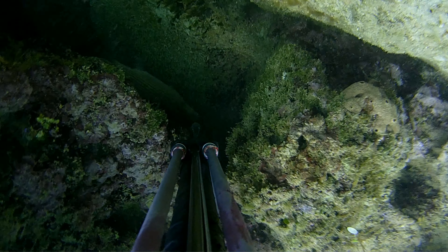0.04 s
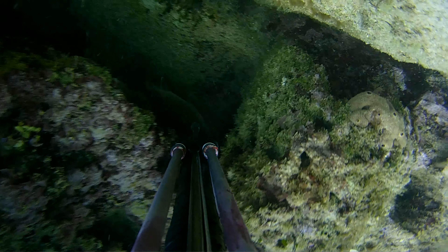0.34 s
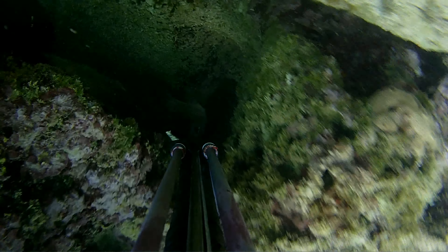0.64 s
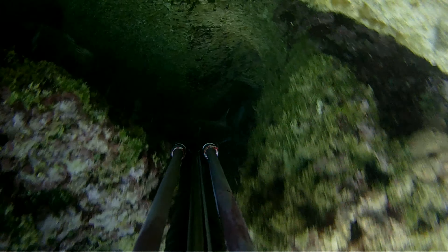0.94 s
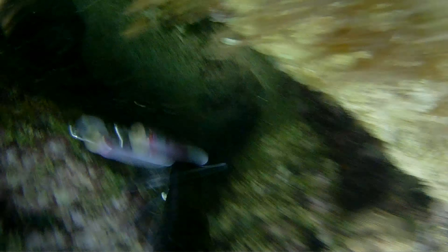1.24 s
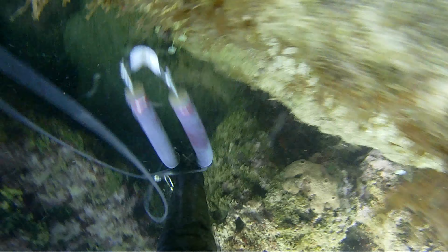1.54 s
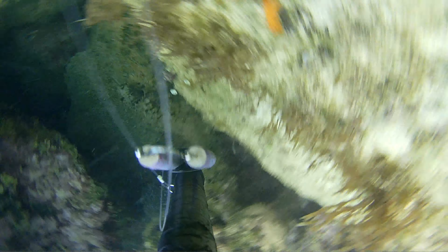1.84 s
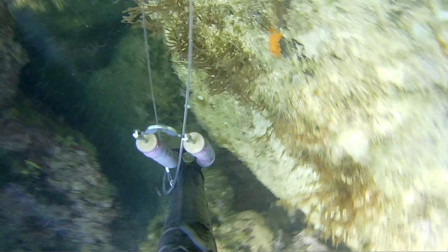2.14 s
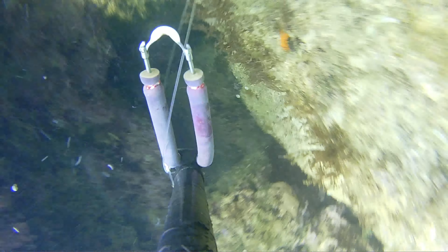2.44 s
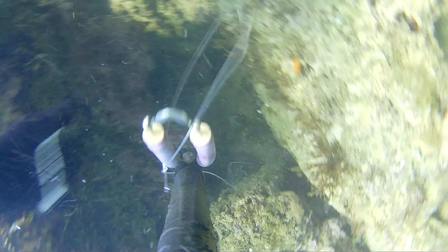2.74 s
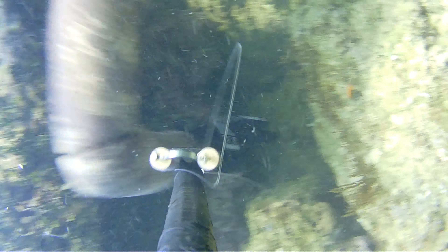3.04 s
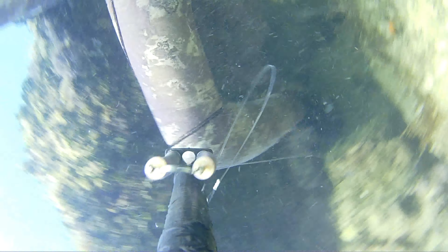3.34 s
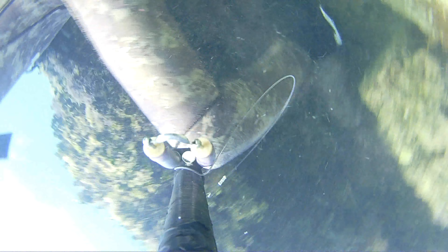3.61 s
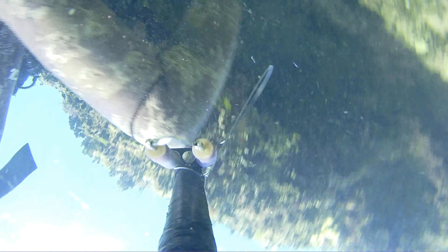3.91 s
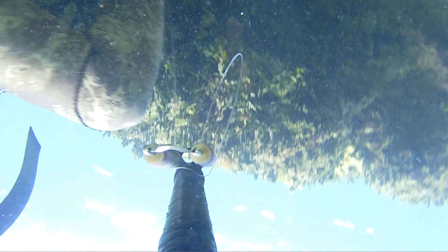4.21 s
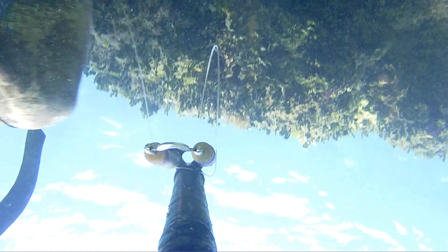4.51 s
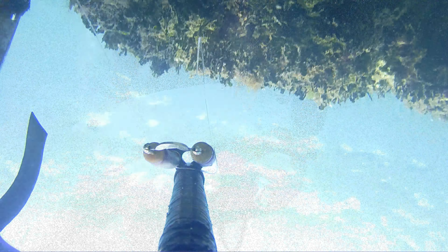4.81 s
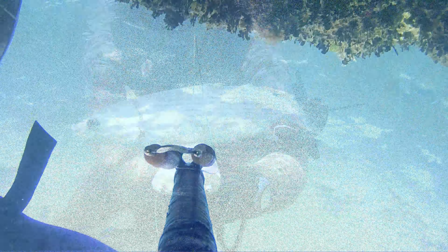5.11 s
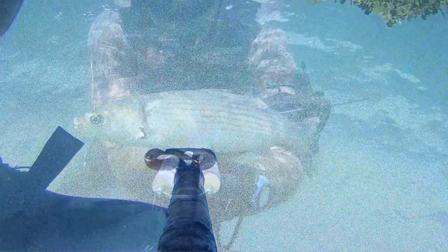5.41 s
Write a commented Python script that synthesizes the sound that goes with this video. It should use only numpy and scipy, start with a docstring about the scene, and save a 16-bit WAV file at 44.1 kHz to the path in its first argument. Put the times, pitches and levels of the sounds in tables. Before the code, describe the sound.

A speargun is heard very close under water, through a sealed housing mounted on it. Soft knocks and a low swirl of water lead to one loud, slightly distorted shot as the spear clatters down its rail. Line and rubber bands then rub along the barrel with tiny bubbles and short squeaks. Afterwards there is mostly a faint steady hiss and the scattered clicks of reef shrimp.

```python
"""A faint hiss and the crackle of reef shrimp, under water, from a camera in a sealed housing on a speargun.
Handling knocks ring the barrel right by the microphone, and water eddies round the housing at each jolt.
The gun fires: the spear chatters down its rail and overloads the input. The line whips out, the slack
bands wobble, rub and squeak, small bubbles gurgle, and the shrimp snap on between a few last knocks."""
import sys
import numpy as np
from scipy import signal
from scipy.fft import rfft, irfft
from scipy.io import wavfile
from scipy.ndimage import uniform_filter1d

SR = 44100
rng = np.random.default_rng(int(sys.argv[2]) if len(sys.argv) > 2 else 0)


def generate_wav(signal):
    """Clip the signal to [-1, 1] and save it as 16-bit WAV at the path in sys.argv[1]."""
    frames = np.transpose(np.atleast_2d(signal))
    scaled = np.clip(frames, -1, 1) * 32767
    pcm = np.round(scaled).astype(np.int16)
    wavfile.write(sys.argv[1], SR, pcm)


N = 245195
T = np.arange(N) / SR
RING_T = T[:SR // 4]  # time axis of one short sound


def undb(db):
    """Decibels to gain."""
    return 10 ** (np.asarray(db) / 20)


def unit(x):
    """Scale to rms 1."""
    return x / np.sqrt(np.mean(x ** 2) + 1e-18)


def add(track, start_s, sound):
    """Mix a sound into the track."""
    start = int(start_s * SR)
    track[start:start + len(sound)] += sound[:N - start]


def colour(x, points, size=4096):
    """Minimum-phase filter through (freq_hz, gain_db) points."""
    hz, db = np.transpose(points)
    grid_hz = np.maximum(np.fft.rfftfreq(size, 1 / SR), 1)
    gain = undb(np.interp(np.log(grid_hz), np.log(hz), db))
    cepstrum = irfft(np.log(gain))
    cepstrum[1:size // 2] *= 2
    cepstrum[size // 2 + 1:] = 0
    return signal.fftconvolve(x, irfft(np.exp(rfft(cepstrum))))[:len(x)]


def resonate(x, hz, width_hz):
    """One resonance, gain 1 at its centre."""
    return signal.lfilter(*signal.iirpeak(min(hz, SR / 2 - 1), hz / width_hz, fs=SR), x)


def body(x, modes):
    """A bank of (pitch_hz, width_hz, gain_db) resonances."""
    return sum(undb(db) * resonate(x, hz, width) for hz, width, db in modes)


def ring(modes, rise_s):
    """Decaying modes of a struck body, building up over the contact."""
    hz, db, t60_s = np.transpose(modes)[:, :, None]
    decays = undb(-60 * RING_T / t60_s)
    tones = undb(db) * decays * np.sin(2 * np.pi * hz * RING_T)
    onset = 1 - np.exp(-(RING_T / rise_s) ** 2)
    return tones.sum(axis=0) * onset / np.max(onset * decays[0])


def fade(t60_s, rise_s):
    """Envelope that builds up and dies away, peak 1."""
    onset = 1 - np.exp(-(RING_T / rise_s) ** 2)
    envelope = onset * undb(-60 * RING_T / max(t60_s, 1e-3))
    return envelope / envelope.max()


def swell(peak_s, rise_s, fall_s, hold_s=0):
    """Envelope that peaks and holds; rise and fall are times per 20 dB, at least 1 ms."""
    before = np.maximum(peak_s - T, 0) / max(rise_s, 1e-3)
    after = np.maximum(T - peak_s - hold_s, 0) / max(fall_s, 1e-3)
    return undb(-20 * (before + after))


def walk(rate_hz):
    """Slow random drift, spread near 1."""
    step = int(SR / rate_hz)
    return uniform_filter1d(np.repeat(rng.standard_normal(N // step + 1), step), step)[:N]


def grains(per_s, spread_db):
    """Random impulses, mostly small with a few larger ones."""
    sizes = undb(spread_db * np.minimum(rng.exponential(size=N), 3))
    return (rng.random(N) < per_s / SR) * rng.choice([-1, 1], N) * sizes


# Background hiss at the microphone: freq_hz, gain_db
HISS_COLOUR = [(15, -14.5), (25, -0.5), (114, 2), (326, 1), (641, -3.5), (1700, -15.5), (2610, -20),
               (2910, -21), (3250, -24), (4030, -22.5), (5280, -29), (6050, -26.5), (8590, -31),
               (12900, -31.5), (16000, -38)]


def hiss(level_db=-53.5):
    """A faint hiss lies under everything, barely wavering."""
    return unit(colour(rng.standard_normal(N), HISS_COLOUR)) * undb(level_db + 1.2 * walk(13))


# What reaches the microphone through the sealed housing: freq_hz, gain_db
HOUSING_COLOUR = [(500, -6), (1800, -19), (3000, -3), (4100, 5.5), (5000, -5), (6300, -5.5), (7700, -6.5),
                  (9000, -9), (12000, -20), (16000, -15.5)]
# The housing walls around the microphone: pitch_hz, width_hz, gain_db
WALL_MODES = [(3010, 220, 8), (3700, 200, 3), (6020, 530, -3), (6730, 120, -9.5), (8460, 430, -7.5),
              (10450, 620, -12.5)]


def housing(x, wall_db=3):
    """Clicks pass through the housing and ring its walls."""
    return colour(x, HOUSING_COLOUR) + undb(wall_db) * body(x, WALL_MODES)


def collapses(impulses, t60_s):
    """Each impulse is a collapsing bubble: a brief burst, smeared by echoes off the rocks."""
    power = np.abs(signal.oaconvolve(impulses ** 2, fade(t60_s, .00044) ** 2)[:N])
    return np.sqrt(power) * rng.standard_normal(N)


# Shrimp scattered over the reef, one row per tone colour: centre_hz, width_hz, level_db
REEF_TICKS = [(3500, 3700, -5.5), (6600, 4400, -6.5), (12700, 4900, -6)]
# Overall gain of the distant reef: time_s, gain_db
REEF_GAIN = [(0.0, -59), (0.35, -65.5), (1.1, -67), (2.5, -62), (3.5, -59.7), (4.6, -64.5), (5.56, -61.5)]


def distant_shrimp(crackle_db=-5, fizz_db=-9, spread_db=5.5, ticks_per_s=26):
    """Scattered shrimp tick over the reef; distant ones merge to a crackle, the farthest to a fizz."""
    crackle = collapses(grains(per_s=290, spread_db=spread_db), t60_s=.015)
    out = undb(crackle_db) * unit(housing(crackle))
    for hz, width, db in REEF_TICKS:
        impulses = (rng.random(N) < ticks_per_s / SR) * undb(spread_db * rng.uniform(-1, 1, N))
        ticks = housing(collapses(impulses, t60_s=.01))
        out += undb(db) * unit(resonate(ticks, hz, width))
    fizz = unit(resonate(grains(per_s=3000, spread_db=spread_db), 8860, 1600))
    return (out + undb(fizz_db) * fizz) * undb(np.interp(T, *np.transpose(REEF_GAIN)))


# The shrimp nearest the microphone, levels before trim: start_s, click_db, knock_db
CLOSE_SNAPS = [(0.2056, -39, -63), (0.6454, -36.5, -56), (0.6924, -38, -58), (1.0672, -41, -59),
               (1.0839, -37, -56), (3.149, -31, -54.5), (3.3106, -38, -50), (3.3903, -35, -47.5),
               (3.4191, -35, -48), (3.5391, -36.5, -57), (3.7047, -33.5, -51), (3.9438, -39, -50.5),
               (3.9942, -27, -49.5), (4.058, -38.5, -52.5), (4.2385, -41, -54), (4.363, -45, -49.5),
               (4.9264, -37.5, -58), (5.0325, -38, -60), (5.0739, -40, -60), (5.3127, -39, -50),
               (5.5371, -36, -61)]


def close_shrimp(click_trim_db=-6.2, knock_trim_db=2, echo_share=.037):
    """Close snaps, each with a faint echo and a short knock of the housing under it."""
    click_shape = fade(.013, .00047) + echo_share * fade(.06, .0043)
    click_gain, knock_gain = np.zeros((2, N))
    for start_s, click_db, knock_db in CLOSE_SNAPS:
        add(click_gain, start_s, undb(click_db + click_trim_db) * click_shape)
        add(knock_gain, start_s, undb(knock_db + knock_trim_db) * fade(.032, .00077))
    click = unit(resonate(housing(rng.standard_normal(N)), 5000, 9400))
    knock = unit(resonate(rng.standard_normal(N), 1930, 480))
    return click_gain * click + knock_gain * knock


# The barrel that carries the housing: pitch_hz, level_db, t60_s
BARREL_MODES = [(682.7, 0.5, 0.062), (649.2, -3, 0.056), (744, -7, 0.032), (462.6, -13.5, 0.049),
                (561.7, -10, 0.048), (1035.5, -21.5, 0.059), (1403, -27.5, 0.083), (1870, -37.5, 0.084)]
# The whole gun swaying against the water: pitch_hz, level_db, t60_s
SWAY_MODES = [(117, 2, 0.18), (84, -2, 0.14), (46.14, -1.5, 0.15), (180.6, -14.5, 0.1),
              (256.5, -14.5, 0.102)]
# Loose trigger, spear and wishbone, close by: pitch_hz, width_hz, gain_db
FITTING_MODES = [(835, 82, -1), (1087, 130, -1), (1387, 140, 0), (1640, 153, -8), (1886, 106, -1),
                 (2377, 113, -7.5), (2880, 380, -7), (3410, 170, -12)]


def blows(rows, width_share, t60_s, sway_db=-14):
    """Each blow rings the barrel, rocks the gun and rattles it; harder ones are sharper and brighter."""
    out, tick_gain = np.zeros((2, N))
    for start_s, level_db, ring_db, hardness in rows:
        contact_s = .0115 * (.0013 / .0115) ** hardness
        clack_hz = 900 * (2500 / 900) ** hardness
        tick_db = np.interp(hardness, (0, 1), (-35.5, 1))
        clack = resonate(rng.standard_normal(len(RING_T)), clack_hz, width_share * clack_hz)
        rattle = unit(body(clack, FITTING_MODES))
        add(out, start_s, undb(ring_db) * ring(BARREL_MODES, contact_s))
        add(out, start_s, undb(level_db + sway_db) * ring(SWAY_MODES, contact_s))
        add(out, start_s, undb(level_db) * rattle * fade(t60_s, .74 * contact_s))
        # water damps the treble soonest
        add(tick_gain, start_s, undb(level_db + tick_db) * fade(.6 * t60_s, .5 * contact_s))
    return out + tick_gain * unit(housing(rng.standard_normal(N)))


# Knocks on the gun, right by the microphone: start_s, level_db, ring_db, hardness (0 to 1)
GUN_KNOCKS = [(0.516, -29.5, -10.5, .12), (0.525, -27, -21.5, 0.48), (0.534, -29, -19.5, .98),
              (0.555, -35, -50, .62), (0.5925, -28, -28, .3), (0.749, -47, -39.5, 0.26),
              (0.928, -33, -19, .25), (0.944, -42, -42, 0.99), (1.106, -43, -40, .25),
              (1.118, -42.5, -34.5, 0.15), (1.1575, -28, -38, 0.93), (1.174, -31, -27, 0.94),
              (1.244, -11, -12, .98), (1.282, -14, -10, .95), (1.313, -24, -18, .62),
              (1.335, -31.5, -26, 0.43), (1.379, -37, -29, .3), (1.412, -33, -35, .45),
              (1.440, -35.5, -38, .42), (1.504, -47, -34, .02), (2.113, -54, -33, .1),
              (2.145, -48, -35.5, 0.27), (2.332, -27.5, -29, 0.1), (2.419, -38, -35, .05),
              (2.477, -30.5, -38, .35), (2.615, -42.5, -38, 0.08), (2.919, -32.5, -43, .58),
              (3.040, -38.5, -44.5, 0.9), (4.640, -44, -38, .4), (5.431, -31.5, -44.5, 0.89),
              (5.441, -44, -40, .7)]


def knocks():
    """Handling and the clatter after the shot strike the gun with short blows."""
    return blows(GUN_KNOCKS, width_share=.45, t60_s=.031)


# Jolts of gun and microphone together, the strongest the recoil: start_s, sway_db, eddy_db, fall_s
GUN_JOLTS = [(0.524, -15.5, -26, .24), (0.749, -38, -49, 0.1), (0.935, -40, -29, 0.25),
             (1.195, -1, 3, .045), (1.248, -6, -2, .055), (1.279, -22, -29, 0.26), (2.31, -53, -43, .3),
             (2.43, -46, -32.5, .22), (2.73, -58, -47, .26)]
# Eddies right against the housing: freq_hz, gain_db
EDDY_COLOUR = [(15, 2.5), (30, 0.5), (55, -1.5), (100, -1), (150, -13.5), (250, -26), (600, -64.5)]
JOLT_CONTACT_S = .0031


def jolts(eddy_rise_s=.007):
    """Each jolt sets the gun swaying and sheds eddies that rumble on the housing."""
    sway, eddy_gain = np.zeros((2, N))
    for start_s, sway_db, eddy_db, fall_s in GUN_JOLTS:
        add(sway, start_s, undb(sway_db) * ring(SWAY_MODES, JOLT_CONTACT_S))
        eddy_gain += undb(eddy_db) * swell(start_s, eddy_rise_s, fall_s)
    return sway + eddy_gain * unit(colour(rng.standard_normal(N), EDDY_COLOUR))


# The housing booming round the microphone, rung loud only by the shot: pitch_hz, level_db, t60_s
BOOM_MODES = [(227, 0, .09), (275, -2, .08), (183, -6, .08), (340, -10, .05), (456, -5, .08),
              (500, -6, .08)]
RELEASE_S, RELEASE_DB, RELEASE_RING_DB, RELEASE_HARDNESS = 1.1845, 11, -4, .66
CHATTER_S, CHATTER_DB, CHATTER_RING_DB, CHATTER_HARDNESS = 1.206, -1.5, 6, .6


def shot(count=8, length_s=.086, scatter_s=.002, fall_db_per_s=115, boom_db=-9.5):
    """The release cracks, then the spear strikes its rail in weakening blows; the housing booms."""
    release = [(RELEASE_S, RELEASE_DB, RELEASE_RING_DB, RELEASE_HARDNESS)]
    delays_s = np.linspace(0, length_s, count) + scatter_s * rng.uniform(-1, 1, count)
    chatter = [(CHATTER_S + delay, CHATTER_DB - drop, CHATTER_RING_DB - drop, CHATTER_HARDNESS)
               for delay, drop in zip(delays_s, fall_db_per_s * delays_s)]
    out = blows(release, width_share=1, t60_s=.046) + blows(chatter, width_share=.7, t60_s=.05)
    for start_s, _, ring_db, _ in release + chatter:
        add(out, start_s, undb(ring_db + boom_db) * ring(BOOM_MODES, JOLT_CONTACT_S))
    return out


# Strokes of line and bands along the gun, close up: peak_s, level_db, rise_s, fall_s
RUB_STROKES = [(1.345, -36.5, -0.0151, .135), (1.515, -44.5, .09, 0.23), (1.74, -55.5, .5, .5),
               (1.95, -48, 0.25, .3), (2.28, -40, .07, .24), (2.43, -31.5, 0.1349, .11),
               (2.515, -42, 0.03, 0.08), (2.69, -56, -0.1, .25)]


def rub_effort(reference_db=-42):
    """How hard line and bands rub: the strongest stroke at each moment, 1 at the reference level."""
    strokes = [undb(db - reference_db) * swell(peak_s, rise_s, fall_s)
               for peak_s, db, rise_s, fall_s in RUB_STROKES]
    return np.max(strokes, axis=0)


# Scraping on the gun, heard from inside the housing: freq_hz, gain_db
SCRAPE_COLOUR = [(200, 1.5), (500, 0.5), (1100, 4.5), (1700, 0), (2400, -11), (3600, -10.5), (5000, -27.5),
                 (9000, -55), (15000, -42)]
# The line running out past the microphone: freq_hz, gain_db
SWISH_COLOUR = [(1500, -1), (3500, 11.5), (5000, -5), (6800, 0), (9000, -6), (11000, -24), (16000, -33)]


def rubbing(effort, jerk_db=4.3, barrel_db=-43, scrape_db=-44, swish_db=-62, whip_db=-40):
    """Jerky stick-slip scrapes the gun and rings the barrel; the line whips out and swishes."""
    slips = grains(per_s=2500, spread_db=4.5) * undb(jerk_db * walk(55))
    barrel = undb(barrel_db) * unit(signal.fftconvolve(slips, ring(BARREL_MODES, rise_s=.0013))[:N])
    scrape = undb(scrape_db) * unit(colour(slips, SCRAPE_COLOUR))
    swish = unit(colour(rng.standard_normal(N), SWISH_COLOUR))
    whip_gain = undb(whip_db) * swell(peak_s=1.339, rise_s=.0075, fall_s=.0075, hold_s=.022)
    # harder rubbing is brighter: the swish grows fastest, the barrel's ring slowest
    swish_gain = undb(swish_db) * effort ** 1.9 + whip_gain
    return barrel * effort ** .69 + scrape * effort + swish * swish_gain


def bubbles(effort, gain_db=-40, lowest_hz=950, t60_cycles=45, glide_per_s=6, count=115):
    """Small bubbles shaken loose by the rubbing gurgle, each rising in pitch."""
    first_s, last_s = RUB_STROKES[0][0], RUB_STROKES[-1][0]
    out = np.zeros(N)
    for when, pitch, strength in rng.random((count, 3)):
        hz = lowest_hz * 3.5 ** pitch
        chirp = np.sin(2 * np.pi * hz * (RING_T + glide_per_s * RING_T ** 2 / 2))
        envelope = strength * (lowest_hz / hz) ** .5 * fade(t60_cycles / hz, .0011)
        add(out, first_s + when * (last_s - first_s), chirp * envelope)
    return undb(gain_db) * out * effort


# Slack rubber bands on the gun, near the housing: pitch_hz, level_db, t60_s
BAND_MODES = [(110.4, -34, 0.32), (75, -39, 0.36)]


def band_wobble(start_s=1.36):
    """The rubber bands go slack after the shot and wobble with a low hum."""
    out = np.zeros(N)
    add(out, start_s, ring(BAND_MODES, rise_s=.045))
    return out


# Rubber and line squeaking on the barrel, close up:
# peak_s, level_db, rise_s, fall_s, pitch_hz, glide_octaves_per_s, jitter_share, subtone_db
BARREL_SQUEAKS = [(2.123, -32, .015, .04, 725, 3, .03, -30),
                  (2.390, -37, 0.03, 0.0452, 990, -1, 0.042, -9.5),
                  (2.428, -15, .014, 0.0172, 1090, 8, 0.031, -11.5),
                  (2.783, -52, 0, 0.07, 2860, 6.5, 0.11, -22)]


def squeaks(overtone_db=-22, rough_db=3.5, glide_s=.04):
    """Uneven stick-slip glides in pitch; alternate slips differ, adding a tone an octave down."""
    out = np.zeros(N)
    for peak_s, db, rise_s, fall_s, hz, glide, jitter, subtone_db in BARREL_SQUEAKS:
        octaves = glide * glide_s * np.tanh((T - peak_s) / glide_s)
        slip_hz = hz * 2 ** octaves * (1 + jitter * walk(400))
        phase = 2 * np.pi * np.cumsum(slip_hz) / SR
        tone = np.sin(phase) + undb(subtone_db) * np.sin(phase / 2)
        tone += undb(overtone_db) * np.sin(2 * phase)
        out += tone * undb(db + rough_db * walk(250)) * swell(peak_s, rise_s, fall_s)
    return out


def scene():
    """Reef and gun reach the one microphone; the same effort drives rubbing and bubbles."""
    ambience = hiss() + distant_shrimp() + close_shrimp()
    effort = rub_effort()
    gun = knocks() + jolts() + shot() + rubbing(effort) + bubbles(effort) + band_wobble() + squeaks()
    return (ambience + gun)[None]


def record(dry, ceiling=.33, top_hz=16200):
    """The shot overloads the microphone input, flattening its peaks; the highest treble is cut."""
    lowpass = signal.ellip(8, .2, 70, top_hz, fs=SR, output="sos")
    return signal.sosfilt(lowpass, np.clip(dry, -ceiling, ceiling))


dry = scene()
out = record(dry)
generate_wav(out)
```